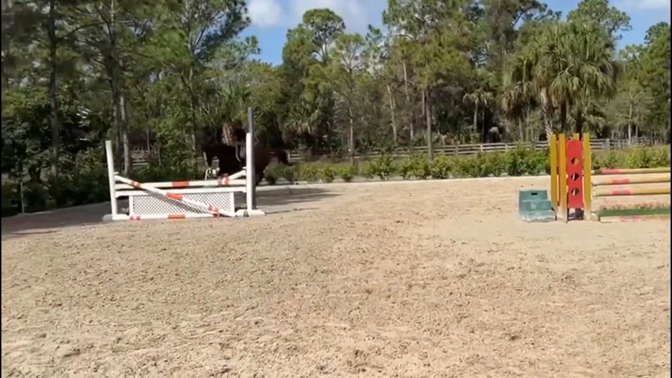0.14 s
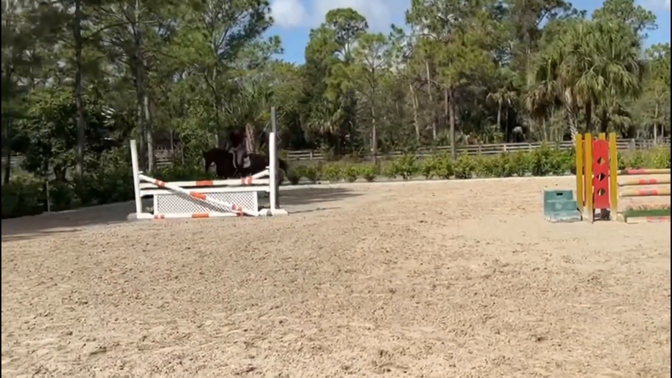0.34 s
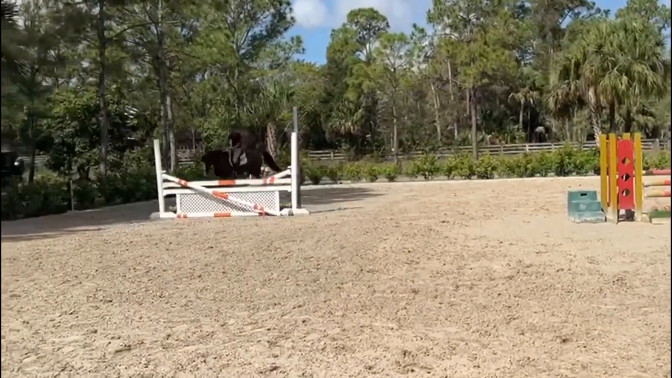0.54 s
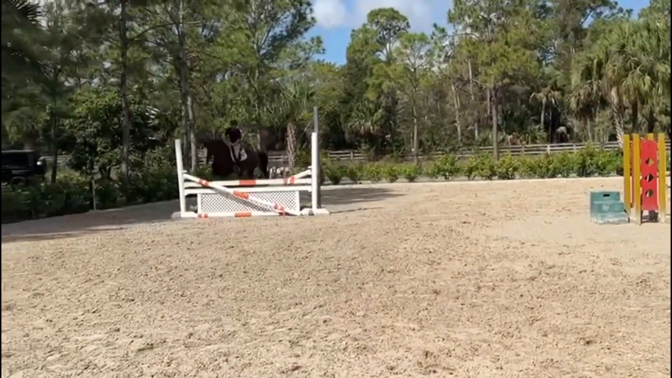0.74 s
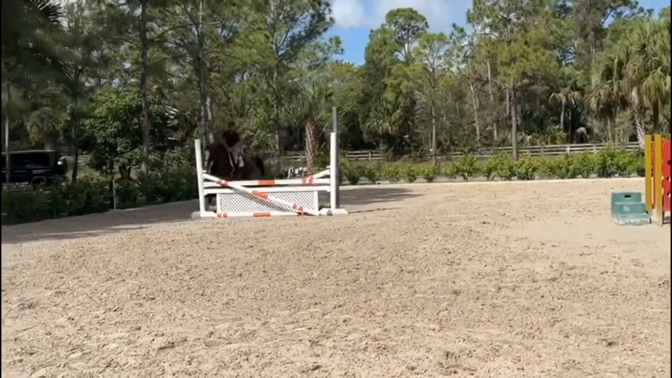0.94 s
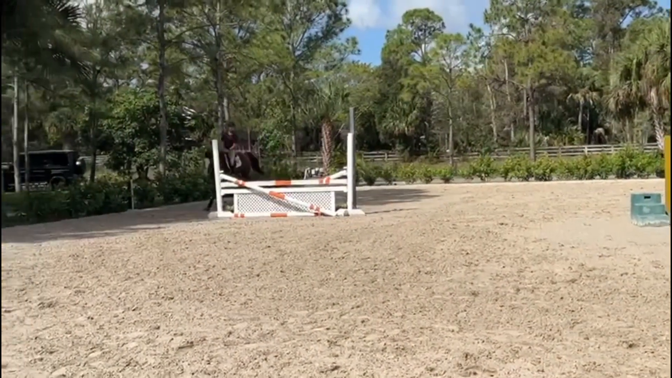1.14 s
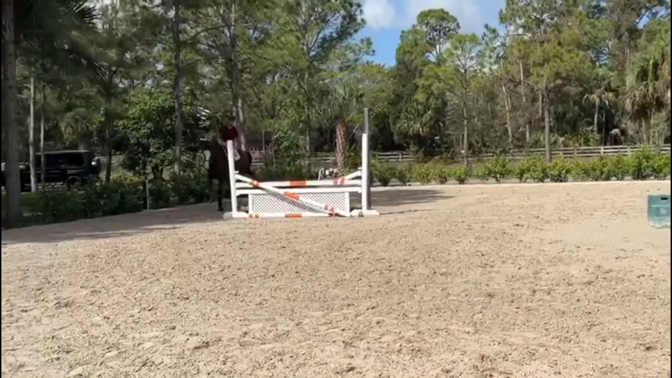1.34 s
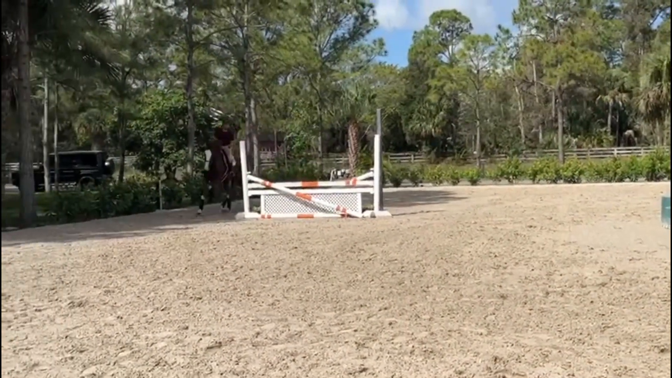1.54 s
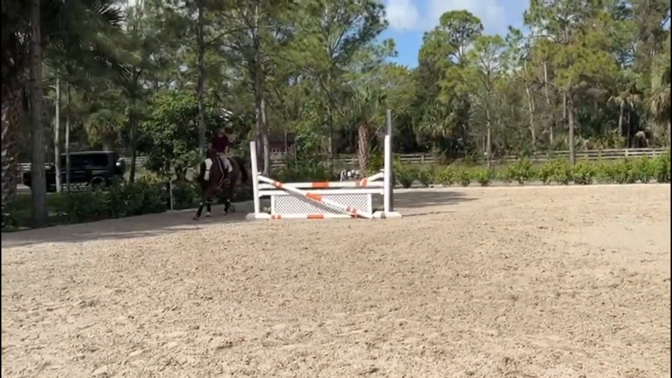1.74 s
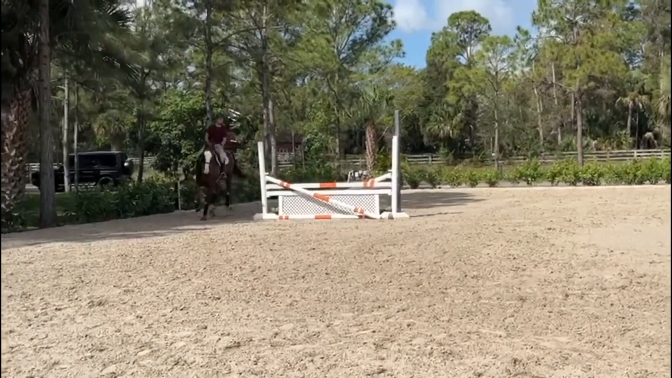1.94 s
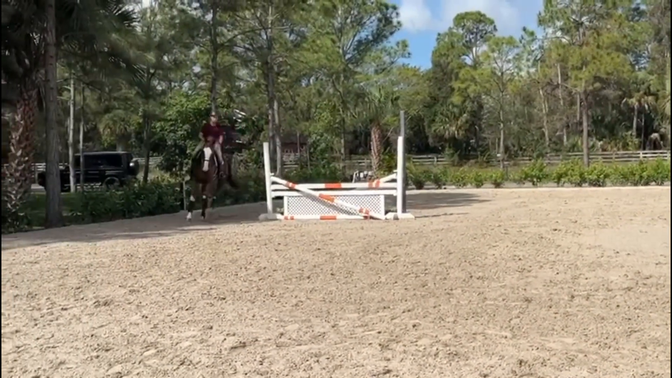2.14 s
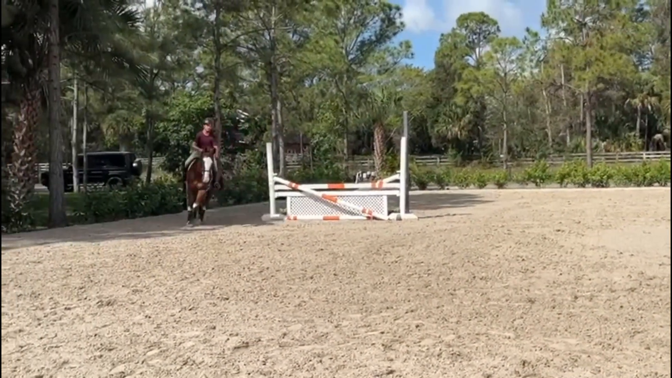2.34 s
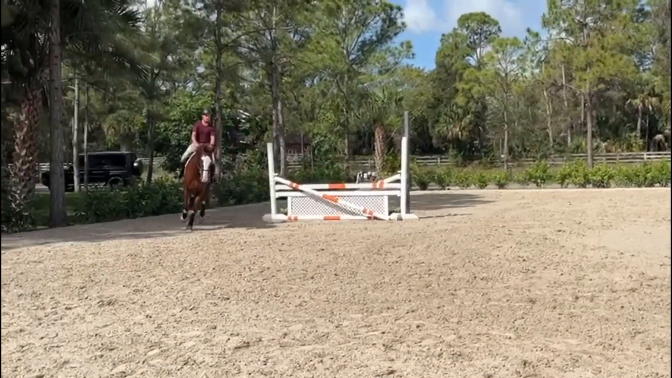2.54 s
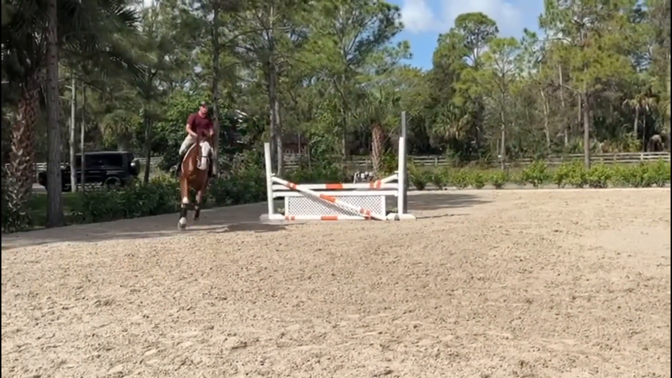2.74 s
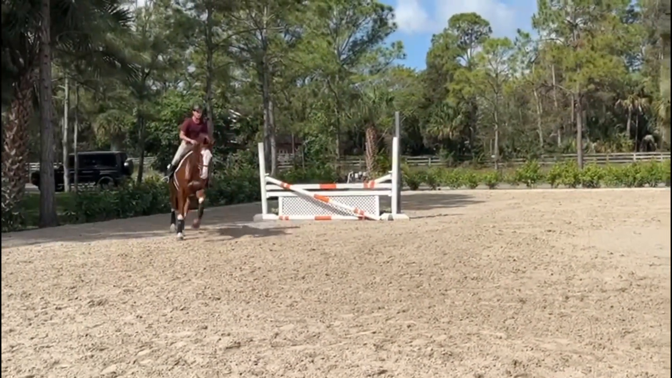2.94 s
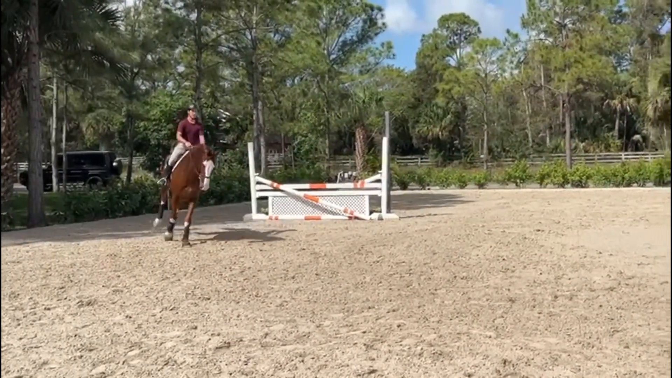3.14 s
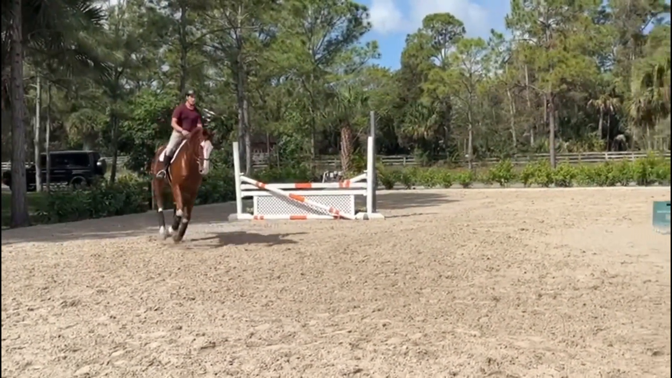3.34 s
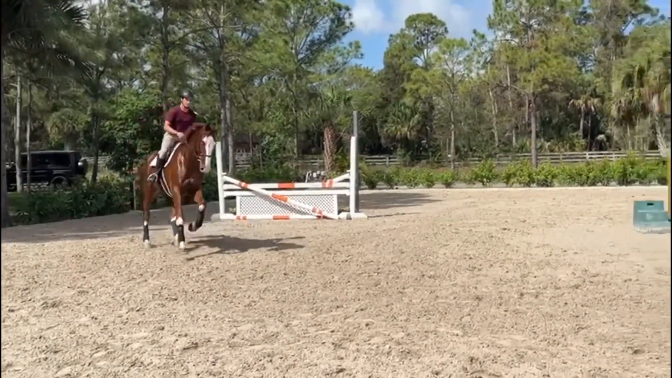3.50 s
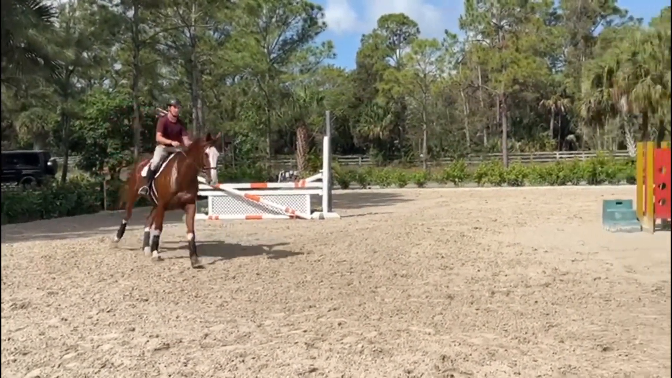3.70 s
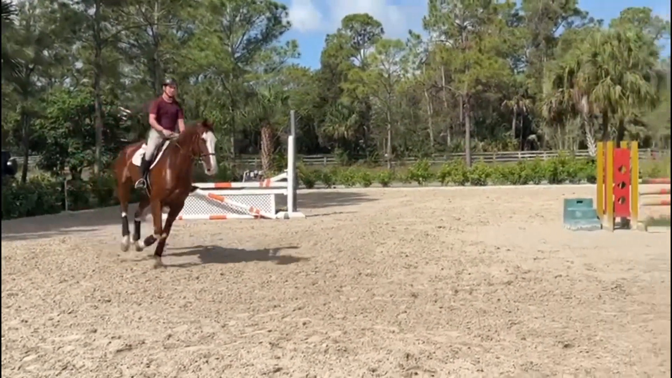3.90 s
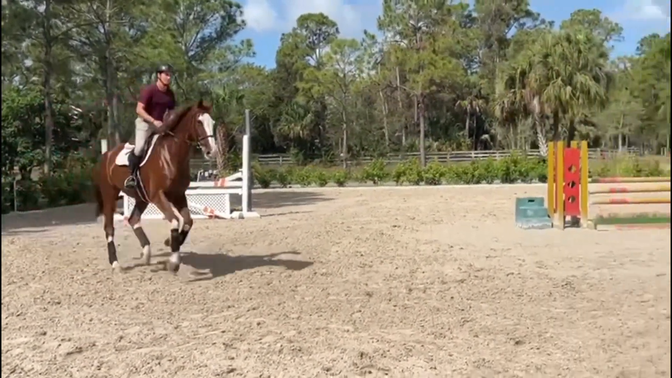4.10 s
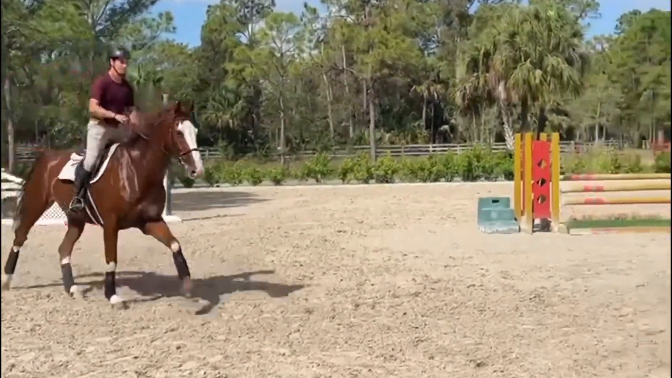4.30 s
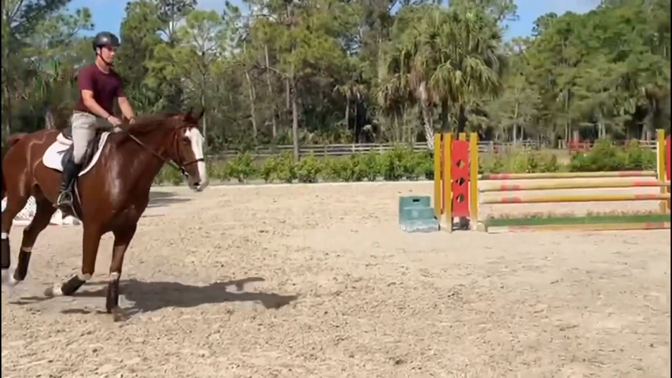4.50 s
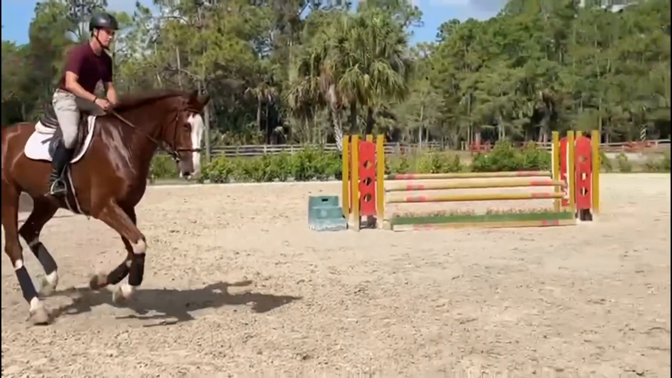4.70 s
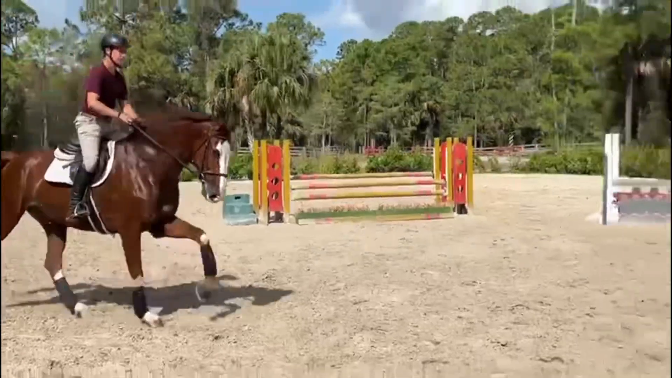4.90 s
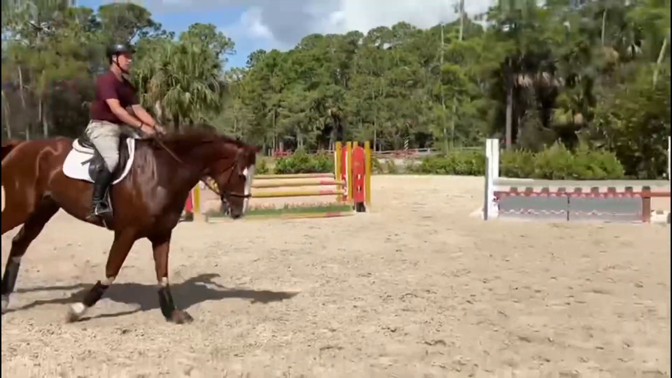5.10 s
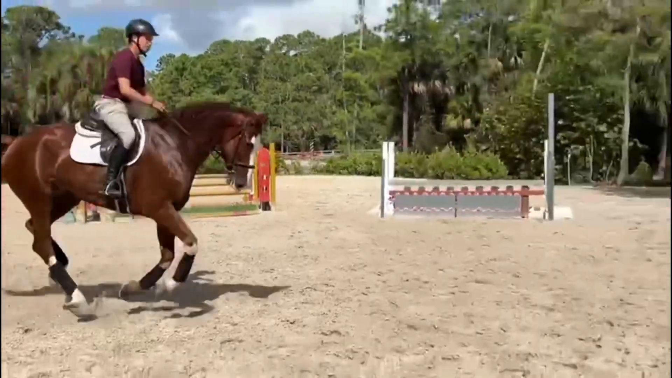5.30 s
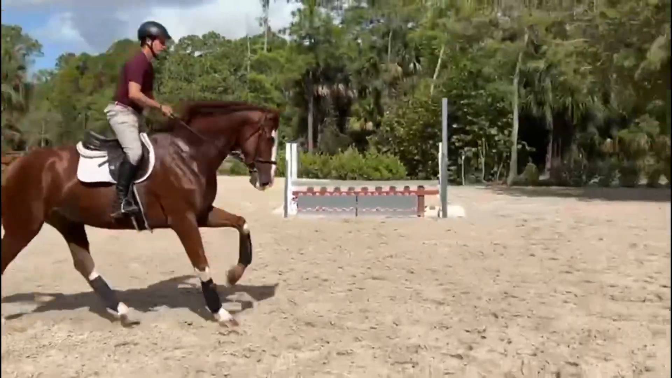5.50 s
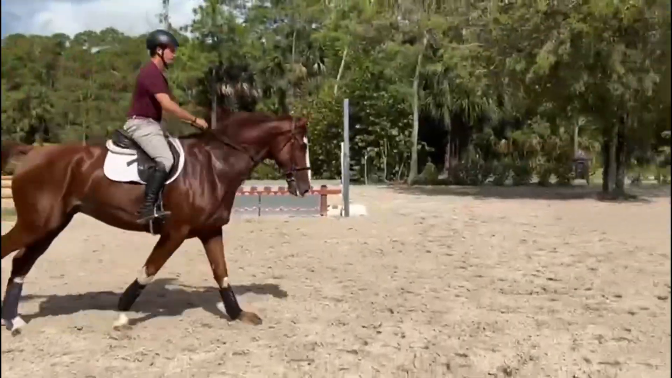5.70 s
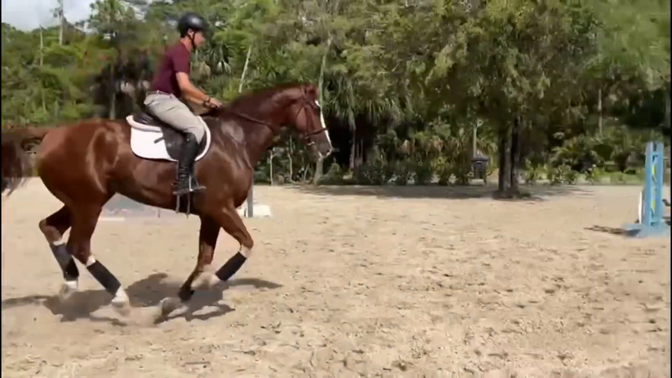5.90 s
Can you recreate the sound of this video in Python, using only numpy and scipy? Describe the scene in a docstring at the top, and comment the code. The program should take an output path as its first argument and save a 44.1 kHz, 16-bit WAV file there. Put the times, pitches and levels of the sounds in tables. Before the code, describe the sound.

An open sand arena beside trees, heard in stereo from a fixed phone, with a quiet low rumble underneath. From 0 to 1.3 s, faint falling bird slurs and tiny paired notes repeat over distant dull hoof taps. Sharp chips come near 1.4, 2.0, 2.5 and 3.0 s, with quivering trills around 1.8, 2.3 and 2.8 s. Hoof thuds stay small and uneven, with shoe knocks, light toe scuffs and gritty ticks, strengthening after 3 s. Looping whistles rise and drop at about 3.9, 4.2, 4.6 and 4.9 s. Heavy close thuds land at 4.25, 4.4 and 4.9 s, with a crisp tick at 4.57. From 4.6 to 4.9 s the horse blows a rapid fluttering snort with hissing breath; it resumes weakly around 5.05 and splits into single puffs until 5.3. The rumble swells near 5.1 s. More crunching, ticks and the loudest thud arrive around 5.5-5.8 s.

```python
"""A sand arena by pines: a horse canters round, passes close to a phone and blows through fluttering nostrils.
Hooves are short ringing thuds with a knock and crunch; ticks and low knocks are bursts of shaped noise.
The snort is a row of air puffs with hissing breath, and songbirds are gliding, near-pure tones.
A far low rumble is drifting background noise. The phone delays the bass, so every thud falls in pitch."""
import sys
import numpy as np
from scipy import signal
from scipy.fft import rfft, irfft, next_fast_len
from scipy.io import wavfile
from scipy.ndimage import uniform_filter1d

SR = 44100
rng = np.random.default_rng(int(sys.argv[2]) if len(sys.argv) > 2 else 0)


def transcribe(u):
    """Save the signal u as a 16-bit wav file named by the first command-line argument.

    u: samples, shape (n,) or (channels, n), limited to [-1, 1]; the rate is SR.
    q: integer samples, one column per channel.
    """
    v = np.clip(np.atleast_2d(u).T, -1, 1)
    q = np.round(v * 32767).astype(np.int16)
    wavfile.write(sys.argv[1], SR, q)


N = 262395

# Hooves landing. Each row: start in seconds, thud peak in dB, pitch of the footing in Hz,
# shoe knock in dB over the thud (before a boost of 1.7 times).
HOOF_FALLS = [(0.242, -42.5, 143, -8.5), (0.337, -40.5, 133, -10), (0.497, -40, 97, -11),
              (1.174, -40.5, 72.5, -33), (1.61, -37.5, 162, -12), (1.758, -45, 79.5, -9.5),
              (2.257, -52.5, 218, 7.5), (2.315, -37.5, 135, -11.5), (2.974, -35, 118.5, -7),
              (3.086, -44, 137, -12.5), (3.575, -42, 104, -6), (3.617, -39.5, 113, -11.5),
              (3.75, -34, 190, -15), (3.986, -38.5, 90, -5.5), (4.029, -41.5, 80.5, -33),
              (4.248, -26, 200, -18.5), (4.398, -19.5, 141, -25.5), (4.532, -38, 118, -6.5),
              (4.906, -19, 205, -17), (5.045, -30, 73.6, -32), (5.516, -32.5, 101, -9),
              (5.546, -29.5, 81.5, -9), (5.672, -16, 105, -8), (5.759, -44.5, 79, -5)]
# Short ticks and low knocks of sand, hooves and tack. Each row: time in seconds, peak of the
# bright part in dB, length setting in ms, body in dB over the bright part.
TICKS_AND_KNOCKS = [(1.48, -51, 2.6, -28), (1.7826, -75.5, 1.85, 28.5), (1.976, -55.5, 1.3, -20),
                    (2.1401, -53.5, 2.6, -6), (2.2595, -81, 8.1, 33.5), (2.974, -51, 2.8, 3),
                    (3.0926, -69.5, 1.5, 27), (3.191, -59, 3.2, 6), (3.277, -55, 4.1, -11),
                    (3.287, -57, 2, -15), (3.456, -59.5, 3.9, -19), (3.5852, -71, 6.4, 25),
                    (3.7474, -53, 5, 6), (3.8394, -62, 2.3, 10), (3.922, -52, 6.2, -26),
                    (3.988, -73.5, 2.3, 28.5), (4.0025, -72.5, 1.2, 29.5), (4.2494, -48.5, 4.05, 8.5),
                    (4.345, -61.5, 9.8, 11.5), (4.3981, -43.5, 5.25, 5.5), (4.437, -48, 4.1, -6),
                    (4.4467, -53, 1.2, 6), (4.4833, -51, 2.8, -10), (4.498, -50, 3.5, 9),
                    (4.572, -36, 1.55, -6), (4.7334, -45.5, 1.1, 0), (4.879, -47.5, 7.4, 3.5),
                    (4.9041, -42.5, 6.6, 8.5), (5.0314, -50.5, 1.8, 11.5), (5.112, -51, 1.8, -25),
                    (5.1315, -51, 3, 7), (5.2128, -45, 2.35, -27), (5.227, -53, 1.8, -12),
                    (5.287, -73, 2.4, 19), (5.3735, -48, 6.8, -8), (5.518, -44.5, 5.1, -1),
                    (5.5508, -41, 5, -1), (5.6108, -58, 2.5, -3), (5.6736, -40.5, 2.8, -6),
                    (5.751, -54, 1.44, 6), (5.765, -45.5, 3.47, 5.5), (5.8343, -39.5, 3.95, -6),
                    (5.9117, -72, 2.24, 23.5)]
# Distance of the horse, used for the spraying sand. Each row: time in seconds, distance in metres.
HORSE_DISTANCE = [(0, 24.5), (2.8, 24), (3.6, 16.7), (4.1, 18), (4.4, 8.5), (4.75, 13.7), (5.2, 6.8),
                  (5.95, 13.2)]
# Hooves dragged through the sand. Each row: start in seconds, level in dB before the tone bands are set.
TOE_SCUFFS = [(1.06, -66), (1.74, -69), (2.388, -61), (2.93, -65.5), (3.15, -66.5), (5.14, -72),
              (5.601, -62), (5.779, -61)]
# Nostril flutter, one table a blow. Each row: time in seconds, flaps a second in Hz,
# level in dB before the flaps are made uneven.
FLUTTERS = [
    [(4.621, 62.44, -49), (4.688, 66.1, -51), (4.70, 66.1, -41), (4.769, 62.1, -32), (4.777, 61.9, -25.5),
     (4.8, 62, -27), (4.81, 55.8, -36.5), (4.825, 56.1, -28.5), (4.87, 51.6, -28), (4.89, 47.7, -35)],
    [(5.039, 44.2, -34.5), (5.115, 48.1, -33)],
]
# Last single flaps. Each row: time in seconds, peak of the puff in dB.
LONE_FLAPS = [(5.149, -40), (5.186, -27.5), (5.234, -30.5), (5.307, -30.5)]
# Breath rushing out. Each row: time in seconds, level in dB before it flickers and follows the flaps.
BREATH_LEVEL = [(4.58, -64), (4.65, -51.5), (4.75, -52), (4.88, -61), (5.0, -65), (5.15, -51.5),
                (5.19, -57.5), (5.25, -83)]
# Looping whistles of the near bird. Each row: time of the top in seconds, climb in seconds,
# drop in seconds, tail in seconds, peak in dB, low lead-in note in dB.
LOOP_WHISTLES = [(3.871, .047, 0.016, 0.068, -46.5, -80), (4.235, 0.06, 0.031, 0.089, -46.5, -66.5),
                 (4.595, .068, 0.029, 0.081, -46.5, -62.5), (4.944, 0.067, 0.037, 0.1, -46.5, -67)]
# Sharp chips. Each row: start in seconds, peak setting in dB, pitch factor.
CHIP_CALLS = [(1.405, -57, 0.94), (2.019, -53, 0.96), (2.476, -45, 0.99), (3.049, -51.5, 0.97)]
# Shape of a chip. Each row: seconds from the start, pitch in Hz before the pitch factor, level in dB.
CHIP_SHAPE = [(0, 2300, 4), (.004, 3465, -12.5), (.009, 2475, -2), (.012, 3076, -17.5), (.02, 2600, -3.5),
              (.034, 2660, -3)]
# Falling slurs with a quivering tail. Each row: start in seconds, peak in dB before the quiver.
SLUR_CALLS = [(-.075, -52), (.149, -59), (.392, -61), (.662, -63), (1.162, -63)]
# Shape of a slur. Each row: seconds from the start, pitch in Hz, level in dB.
SLUR_SHAPE = [(0, 2620, -10), (.014, 2230, -3), (.03, 2130, 0), (.06, 2085, -5), (.11, 2065, -10),
              (.165, 2010, -22)]
# Trills that swell, fade and creep upward. Each row: start in seconds, length in seconds, peak setting in dB.
TRILL_CALLS = [(1.803, 0.21, -59), (2.251, 0.21, -55), (2.747, 0.26, -53.5)]
# One beat of a trill. Each row: seconds from the start, pitch in Hz before flattening, rise
# and the trill's pitch factor, level in dB.
TRILL_BEAT = [(0, 2330, -13), (.012, 2130, -5), (.022, 2030, -2), (.034, 1960, -9)]
# Faint held notes. Each row: start in seconds, length in seconds, pitch in Hz, peak in dB.
HELD_NOTES = [(0.194, 0.19, 2875, -82), (5.85, 0.13, 506, -63)]
# A faint far singer repeats a pair of notes. Each row: start in seconds, peak in dB.
PAIR_CALLS = [(.04, -77), (.338, -74), (.628, -76), (.925, -74), (1.222, -74.5)]
# Shape of the pair, a high note and a lower falling one. Each row: seconds from the start, pitch in Hz, level in dB.
PAIR_SHAPE = [(0, 3780, -8), (.012, 3700, 0), (.028, 3620, -8), (.029, 3620, -40), (.031, 3040, -10),
              (.048, 2910, 0), (.095, 2870, -10)]
# Tone colour of the background noise, with a dip near 9.6 kHz.
# Each row: frequency in Hz, relative strength in dB per Hz.
AIR_COLOUR = [(15, -47), (25, -17), (63, 8), (106, -1), (198, -8.5), (350, -12.5), (557, -19.5),
              (821, -20.5), (1180, -30.5), (2140, -32.5), (2920, -32.5), (4890, -49.5), (8200, -53),
              (9580, -74), (12100, -59.5), (15700, -96), (22000, -120)]
# Stereo width of the background noise. Each row: frequency in Hz, side minus middle in dB.
AIR_WIDTH = [(30, -16), (120, -15.5), (500, -7), (1200, 0), (3000, -17.5), (8000, -45)]
# Swell of the low rumble. Each row: time in seconds, level change in dB.
RUMBLE_SWELL = [(0, -0.5), (1.8, -3.5), (3.5, -2.5), (4.3, 0.5), (4.85, 6.5), (5.1, 9.5), (5.4, 0.5),
                (5.95, -2.5)]
# Bass delay of the phone. Each row: corner in Hz, number of all-pass stages.
BASS_DELAY = [(60, 4.5), (150, 4), (400, 3.5)]

AIR_DB = -50.5  # average level of the background noise
TOP_HZ = 12200  # the phone cuts what lies above
SPRAY_DB = -56  # at 1 m, before hooves and random drift change it
SWISH_DB, SWISH_MS = -26, 22.3  # level and fading time of grains that hiss on after each burst
SCUFF_S, SINK_S_PER_OCTAVE = .018, .03  # time to the loudest moment; delay of lower bands
PUFF_SHARE = 0.027  # typical puff width setting, as a share of its cycle
LEFT_LATE_MS = 0.21  # the flaps reach the right microphone port first
# the nasal passage booms after a lone flap
FLAP_RING_HZ, FLAP_RING_T60_S, FLAP_RING_DB = 68, 0.37, -23
# pitches and relative levels along a looping whistle
FOOT_HZ, CREST_HZ, TAIL_HZ, LEAD_HZ = 2100, 2730, 1930, 1750
START_DB, DROP_DB, TAIL_DB, END_DB = -15.5, -9.5, -8, -23
CREST_S = .012
LEAD_S, LEAD_EARLY_S = .07, .138  # length of the lead-in, and how long before the top it starts
QUIVER_HZ, QUIVER_DB, QUIVER_FROM_S = 83, 5, .05  # the quiver is half grown at the last time
BEAT_S, BEAT_RISE = .0425, .008  # length of a trill beat; share the pitch rises per beat
LOUDEST_AT, EDGE_DB = .5, -44  # loudest share of the trill; drop one whole length away from there
PICKUP_S = .018  # a trill begins part way into its first beat
FLATTEN_S, TRILL_HZ = .27, 2080  # sweeps shrink towards one pitch, given before rise and pitch factor


def hooves():
    """The footing takes the weight and rings briefly; then the shoe knocks and sand crunches under it."""
    out, t = np.zeros((2, N)), np.arange(SR // 8) / SR
    soft, knock = puff(width_ms=0.77), puff(width_ms=0.73)
    chances = rng.standard_normal((len(HOOF_FALLS), len(t)))
    for (s, db, hz, knock_db), chance in zip(HOOF_FALLS, chances):
        ring = np.sin(2 * np.pi * hz * t) * np.exp(-np.log(1000) * t / 0.022)
        thud = band(np.convolve(soft, ring)[:len(t)], 53, 1300)
        add(out, s - .0052, undb(db) * thud / peak(lagged(thud)), .9)
        crunch = band(chance * t * np.exp(-t / 0.0025), 120, 318)
        shoe = 1.7 * knock + 1.85 * crunch / peak(crunch)
        add(out, s - .001, undb(db + knock_db) * shoe, .9)
        # the hoof rolls from heel to toe and breaks the crust in lumps
        lumpy = undb(23 * uniform_filter1d(chance, size=90))
        lumps = band(chance[::-1] * t * np.exp(-t / 0.0058) * lumpy, 67, 620)
        add(out, s, undb(db - 19) * lumps / peak(lumps), .9)
    return echoes(out, t60=0.46, wet_db=-22, alike=1.0)


def ticks_and_spray():
    """Sand, hooves and tack make short noise bursts; a finer spray patters along with them."""
    out, t = np.zeros((2, N)), np.arange(SR // 16) * 1000 / SR  # t in ms
    chances = rng.standard_normal((len(TICKS_AND_KNOCKS), 4, len(t)))
    for (s, db, ms, body_db), chance in zip(TICKS_AND_KNOCKS, chances):
        # the burst swells and dies; random lumps break it up
        lumpy = undb(36.2 * uniform_filter1d(chance[2], size=40))
        shape = t ** 2 * np.exp(-2 * t / max(ms, .3)) * lumpy
        swish_fade = np.minimum(t / 4, 1) * np.exp(-t / SWISH_MS)
        swish = undb(SWISH_DB) * shape.max() * swish_fade * undb(5 * chance[3])
        under_hoof = min(abs(s - row[0]) for row in HOOF_FALLS) < .03
        body_hz = 750 if under_hoof else 1300  # packed sand sounds lower than loose tack
        bright = band(chance[0] * (shape + swish), 1100, 6100)
        body = band(chance[1] * shape, body_hz / 1.65, body_hz * 1.35)
        burst = bright / peak(bright) + undb(body_db) * body / peak(body)
        add(out, s - .001 - .0006 * ms, undb(db) * burst, 1.5 * chance[3, 0])
    spray = sand_spray()
    both = echoes(out, t60=0.15, wet_db=-17.5) + spray
    # split off the treble above 8.8 kHz and lift it by 1 dB
    dull = signal.sosfiltfilt(signal.butter(6, 8800, fs=SR, output="sos"), both)
    treble = undb(1.0) * (both - dull)
    # from 9 to 11 kHz left and right move in opposite phase
    turned = signal.butter(4, [9000, 11000], "band", fs=SR, output="sos")
    treble[1] -= 2 * signal.sosfiltfilt(turned, treble[1])
    return dull + treble


def sand_spray():
    """Each hoof throws fine grains that patter down after it, louder the closer the horse is."""
    thrown, age = np.ones(N), np.arange(N) / SR
    for s, db, *_ in HOOF_FALLS:
        late = np.maximum(age - s, 0)
        thrown += undb(np.clip(db + 38, -8, 6.)) * late / 0.012 * np.exp(-late / 0.028)
    grains = rng.standard_normal((2, N)) * undb(3.5 * rng.exponential(size=N)) * undb(4.5 * walk(45))
    level = undb(SPRAY_DB) / curve(HORSE_DISTANCE)[0] * thrown * undb(1.0 * walk(5.1))
    return unit(band(grains[:1] + 0.12 * grains, 900, 5260)) * level


def scuffs():
    """A dragged toe ploughs the sand: a gritty swish that starts bright and sinks as the toe digs in."""
    grit = rng.standard_normal((2, N)) * undb(2.5 * rng.exponential(size=N)) * undb(3.5 * walk(70))
    grit = grit[:1] + 0.13 * grit[1] * np.array([[1], [-1]])
    out = 0
    for hz, band_db in [(2780, -5.5), (2100, -1.5), (1310, 1.5), (1005, 4), (625, 1.5)]:
        level = 0
        wait_s = SINK_S_PER_OCTAVE * np.log2(1450 / hz)  # lower bands come later
        for s, db in TOE_SCUFFS:
            late = np.maximum(np.arange(N) / SR - s - wait_s, 0) / SCUFF_S
            level = level + undb(db) * late * np.exp(1 - late)
        out = out + undb(band_db - 5) * level * unit(band(grit, hz / 1.2, hz * 1.2))
    return out


def snort():
    """Nostril flaps release puffs of air; breath hisses in step."""
    out, gate = np.zeros((2, N)), np.full(N, .5)
    t = np.arange(SR // 8) / SR
    for rows in FLUTTERS:
        on = slice(int(rows[0][0] * SR), int(rows[-1][0] * SR))
        hz, db = (c[on] for c in curve(rows))
        phase = np.cumsum(hz / SR) % 1
        uneven_db = 3.2 * walk(70)[on]
        chances = rng.uniform(size=(40, 4))
        wraps = np.flatnonzero(np.diff(phase, prepend=1) < 0)  # a puff at each wrap
        for i, (late, size, wide, slip) in zip(wraps, chances):
            s = (on.start + i) / SR
            # no two flaps are alike: wider or narrower, early or late, with a wet rattle behind
            width_ms = 1000 * PUFF_SHARE * (0.82 + 0.38 * wide) / hz[i]
            flap = undb(db[i] + uneven_db[i]) * puff(width_ms, lo_hz=117)
            rattle = band(rng.standard_normal(len(t)) * t * np.exp(-t / 0.003), 170, 550)
            wet_flap = flap + .15 * undb(db[i]) * rattle / peak(rattle)
            add(out, s + .0015 * (slip - .5), wet_flap, -2.5)
            # a weaker upside-down copy follows 3 to 7 ms later and roughens the flap
            add(out, s + 0.0028 + 0.0038 * late, -.3 * size * flap, 4.)
        gate[on] = 0.95 * np.exp(-phase / 0.27) + 0.16
    boom = np.sin(2 * np.pi * FLAP_RING_HZ * t) * np.exp(-np.log(1000) * t / FLAP_RING_T60_S)
    boom = boom * np.cos(4 * np.pi * t) ** 2  # ends in silence
    for s, db in LONE_FLAPS:
        add(out, s, undb(db) * (puff(width_ms=0.56, lo_hz=101) - undb(FLAP_RING_DB) * boom), -2.5)
    hiss = unit(band(rng.standard_normal(N), 560, 1160))
    breath_db = curve(BREATH_LEVEL, -120)[0] + 3.1 * walk(40)
    breath = hiss * uniform_filter1d(gate, size=60) * undb(breath_db)
    out[0] = np.interp(np.arange(N) - LEFT_LATE_MS * SR / 1000, np.arange(N), out[0])
    return echoes(out + breath, t60=0.5, wet_db=-22, alike=0.5)


def puff(width_ms, lo_hz=45):
    """A smooth push of air, too small to radiate deep bass; peak 1 after the phone's bass delay."""
    t = np.arange(SR // 8) * 1000 / SR
    bump = np.exp(-.5 * (t / max(width_ms, .1) - 3) ** 2) * np.minimum(t / width_ms, 1)
    push = band(bump, lo_hz, 2500)
    return push / peak(lagged(push))


def birds():
    """A near whistler and chipper, and far singers, all gliding tones wet with the wood's echoes."""
    near, far = np.zeros((2, N)), np.zeros((2, N))
    for top, climb, drop, tail, db, lead_db in LOOP_WHISTLES:
        loop = whistle_loop(climb, drop, tail)
        whistle = note(loop, warble_hz=79.0, husk_db=2.5, waver_hz=9.7, parts=20)
        add(near, top - climb, undb(db) * whistle, -.8)
        lead_in = note(held(LEAD_S, LEAD_HZ), husk_db=3.5, waver_hz=15.0)
        add(near, top - LEAD_EARLY_S, undb(lead_db) * lead_in, -.8)
    for s, db, factor in CHIP_CALLS:
        add(near, s, undb(db) * note(CHIP_SHAPE, factor, husk_db=2.5), -.6)
    for s, db in SLUR_CALLS:
        slur = note(SLUR_SHAPE, 1., husk_db=1.2, waver_hz=12., parts=24)
        t = np.arange(len(slur)) / SR
        growth = np.clip(t / QUIVER_FROM_S - .5, 0, 1)
        quiver_db = QUIVER_DB * growth * np.sin(2 * np.pi * QUIVER_HZ * t)
        add(far, s, undb(db + quiver_db) * slur, -.6)
    for s, length, db in TRILL_CALLS:
        add(far, s + PICKUP_S, undb(db) * trill(length), -.6)
    for s, length, hz, db in HELD_NOTES:
        add(far, s, undb(db) * note(held(length, hz), 1., husk_db=4.5, waver_hz=.01 * hz), -.6)
    for s, db in PAIR_CALLS:
        add(far, s, undb(db) * note(PAIR_SHAPE, husk_db=3.5, waver_hz=30.0, parts=60), -.6)
    near = echoes(near, t60=0.55, wet_db=-16.5, alike=1.0)
    return near + echoes(far, t60=1.0, wet_db=-9.5, alike=1.54)


def whistle_loop(climb, drop, tail):
    """Shape of a whistle: pitch climbs to a crest, drops back and sinks into a fading tail."""
    middle_hz = (FOOT_HZ + CREST_HZ) / 2
    return [(-climb, FOOT_HZ, START_DB), (-climb / 2, middle_hz - 40, -5),
            (-CREST_S, CREST_HZ - 60, 0), (CREST_S / 3, CREST_HZ, -2),
            (.6 * drop, middle_hz, DROP_DB), (drop, FOOT_HZ, TAIL_DB),
            (drop + tail / 3, TAIL_HZ + 50, TAIL_DB - 9.5), (drop + tail, TAIL_HZ, END_DB)]


def trill(length):
    """One linked, undulating note: each beat sweeps down and climbs back; the phrase swells midway."""
    rows = []
    for since in np.arange(0, length, BEAT_S):
        sweep = np.exp(-(since / FLATTEN_S) ** 2)
        rise = 1 + BEAT_RISE * since / BEAT_S
        for s, hz, db in TRILL_BEAT:
            pitch = (TRILL_HZ + (hz - TRILL_HZ) * sweep) * rise
            swell_db = EDGE_DB * ((since + s) / length - LOUDEST_AT) ** 2
            rows.append((since + s, pitch, db + swell_db))
    return note(rows, 0.98, husk_db=3.0, waver_hz=21.8, parts=90)[int(PICKUP_S * SR):]


def held(length, hz):
    """Shape of a plain note: swells, holds, sags a little and fades."""
    return [(0, 1.015 * hz, -10), (.25 * length, hz, 0),
            (.75 * length, .995 * hz, -1.5), (length, .99 * hz, -12)]


def note(rows, factor=1., warble_hz=0., husk_db=1.0, waver_hz=0., parts=14):
    """A near sine along a rounded pitch line; it may warble while it climbs and waver throughout."""
    s, hz, db = np.transpose(rows)
    t = np.arange(s[0], s[-1], 1 / SR)
    edge = np.clip(np.minimum(t - s[0], s[-1] - t) / .003, 0, 1)
    pitch = uniform_filter1d(factor * np.interp(t, s, hz), size=len(t) // parts, mode="nearest")
    climbing = uniform_filter1d(1. * (np.gradient(pitch) * SR > 7000), size=200)  # over 7000 Hz a second
    warble = climbing * signal.sawtooth(2 * np.pi * 78 * t, .25)
    # slow random drift: one row shakes the level, the other the pitch
    smooth = uniform_filter1d(rng.standard_normal((2, SR // 2)), size=200)
    husk = unit(uniform_filter1d(smooth, size=200))[:, :len(t)]
    tone = np.sin(2 * np.pi * np.cumsum(pitch + warble_hz * warble + waver_hz * husk[1]) / SR)
    level_db = np.interp(t, s, db) + husk_db * husk[0] + (warble_hz > 0) * 2.6 * warble
    return tone * undb(level_db) * edge


def air():
    """Background noise with a far rumble: its bands drift, with their own stereo width at each pitch."""
    hz = np.maximum(np.fft.rfftfreq(N, 1 / SR), 1)

    def shape(rows):
        row_hz, row_db = np.transpose(rows)
        return undb(np.interp(np.log(hz), np.log(row_hz), row_db))

    mid = rfft(rng.standard_normal(N)) * shape(AIR_COLOUR)
    side = rfft(rng.standard_normal(N)) * shape(AIR_COLOUR) * shape(AIR_WIDTH)
    out, swell = 0, curve(RUMBLE_SWELL)[0]
    for centre in 20 * 2. ** np.arange(10):  # overlapping bands, an octave apart
        share = np.clip(1 - np.abs(np.log2(hz / centre)), 0, 1)
        # the swell weakens above 120 Hz
        db = swell * min(120 / centre, 1) + 2.5 * walk(8) + .8 * walk(1.5)
        stereo = irfft(mid * share, N) + irfft(side * share, N) * np.array([[1], [-1]])
        out = out + undb(db) * stereo
    return unit(out) * undb(AIR_DB)


def echoes(x, t60, wet_db, alike=0.9):
    """Trunks and fences scatter a fading tail, partly alike on both sides."""
    t = np.arange(SR) / SR
    fade = np.exp(-np.log(1000) * t / t60) * np.minimum(t / 0.00028, 1)
    tail = rng.standard_normal((2, SR)) * fade
    tail /= np.sqrt(np.sum(tail ** 2, axis=1, keepdims=True))
    return x + undb(wet_db) * signal.fftconvolve(x, tail + alike * tail[:1], axes=1)[:, :N]


def lagged(x):
    """All-pass stages: the lower the note, the later it comes."""
    size = next_fast_len(x.shape[-1] + SR // 4)
    hz = np.fft.rfftfreq(size, 1 / SR)
    phase = sum(-2 * stages * np.arctan(hz / f) for f, stages in BASS_DELAY)
    return irfft(rfft(x, size) * np.exp(1j * phase), size)[..., :x.shape[-1]]


def undb(db):
    """Turns dB into a plain factor."""
    return 10 ** (np.asarray(db) / 20)


def peak(x):
    """Largest swing of a sound."""
    return np.abs(x).max()


def unit(x):
    """Scales a sound to an average (RMS) level of 1."""
    return x / np.sqrt(np.mean(x ** 2))


def curve(rows, outside=None):
    """Columns of a table joined by straight lines in time."""
    s, *cols = np.transpose(rows)
    return [np.interp(np.arange(N) / SR, s, c, outside, outside) for c in cols]


def band(x, lo_hz, hi_hz):
    """Keeps the sound between two frequencies."""
    return signal.sosfilt(signal.butter(2, [lo_hz, hi_hz], "band", fs=SR, output="sos"), x)


def walk(rate):
    """Random levels held 1 / rate seconds and smoothed twice."""
    k = int(SR / rate)
    steps = np.repeat(rng.standard_normal(N // k + 1), k)
    return uniform_filter1d(uniform_filter1d(steps, k), k)[:N]


def add(out, s, sound, pan_db=0.):
    """Lays a short sound into both channels; a positive pan leans left."""
    i = int(s * SR)
    part = sound[..., max(-i, 0):N - i]
    sides = undb(np.array([[pan_db], [-pan_db]]) / 2)
    out[:, max(i, 0):max(i, 0) + part.shape[-1]] += part * sides


def scene():
    """All the sources together."""
    return hooves() + ticks_and_spray() + scuffs() + snort() + birds() + air()


def record(dry):
    """The phone delays the bass and cuts the top."""
    return signal.sosfilt(signal.ellip(8, .2, 70, TOP_HZ, fs=SR, output="sos"), lagged(dry))


dry = scene()
out = record(dry)
transcribe(out)
```